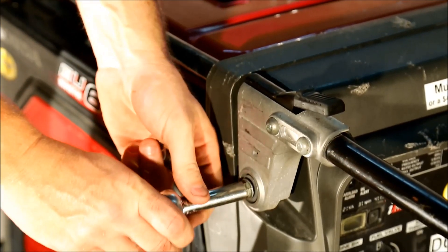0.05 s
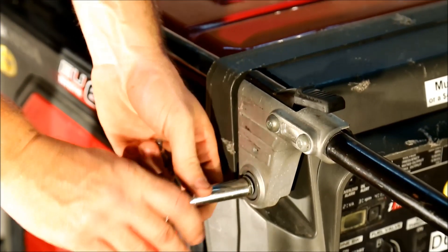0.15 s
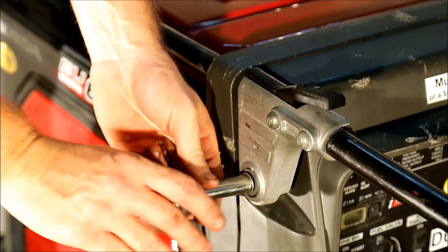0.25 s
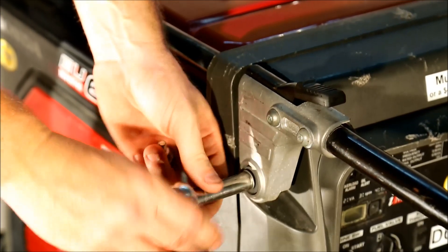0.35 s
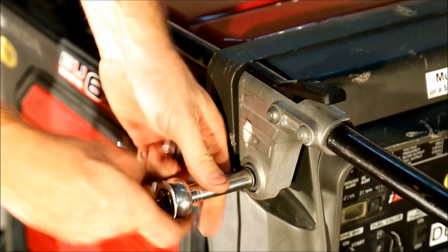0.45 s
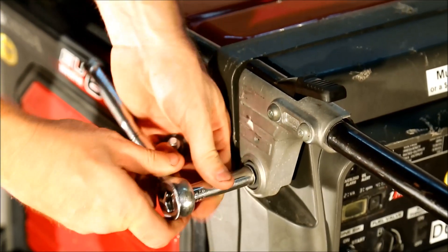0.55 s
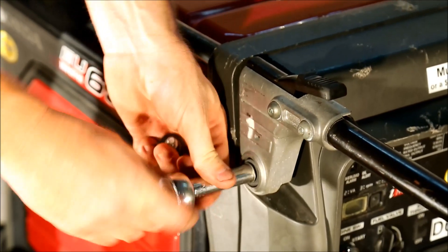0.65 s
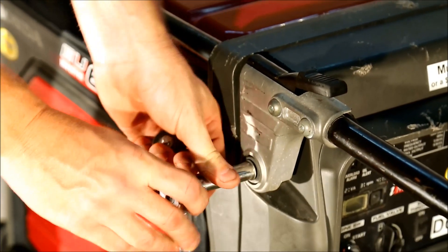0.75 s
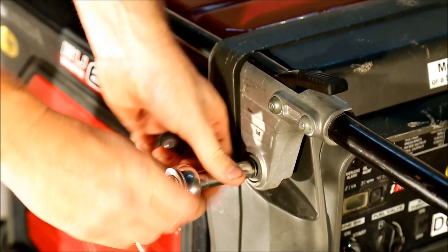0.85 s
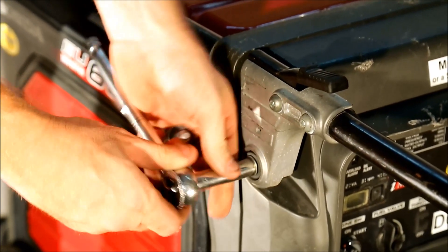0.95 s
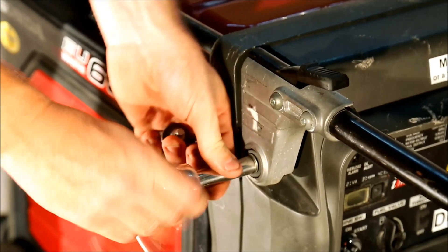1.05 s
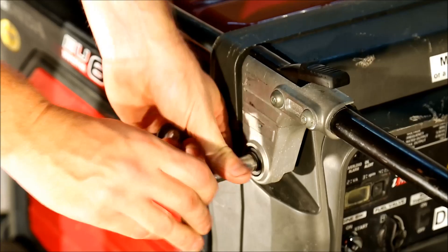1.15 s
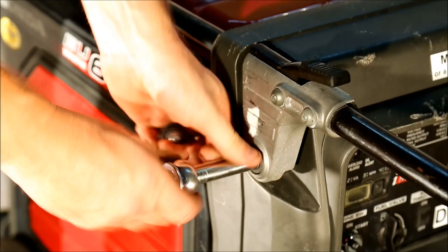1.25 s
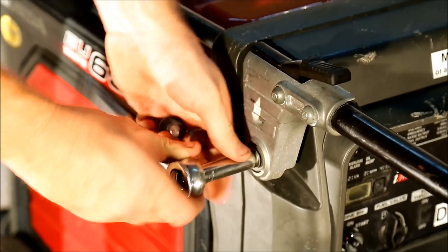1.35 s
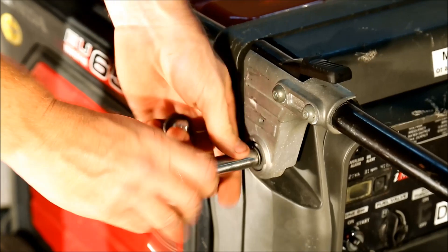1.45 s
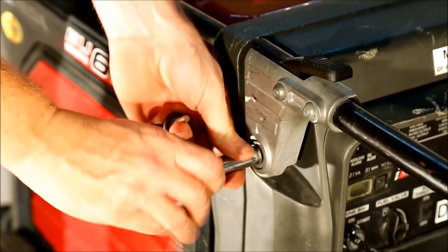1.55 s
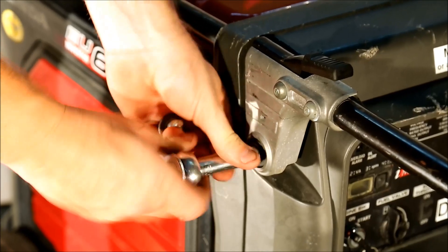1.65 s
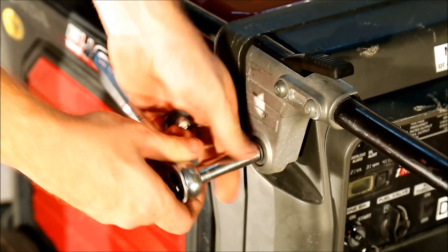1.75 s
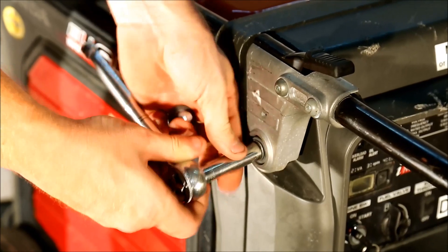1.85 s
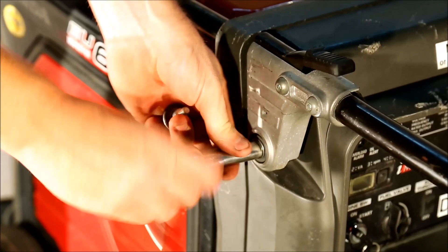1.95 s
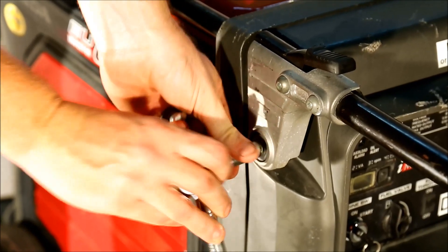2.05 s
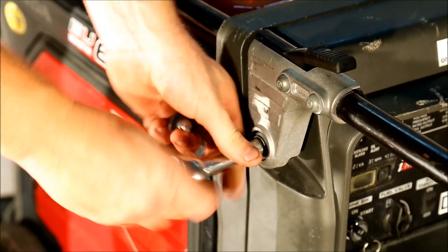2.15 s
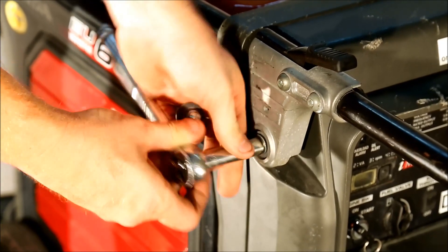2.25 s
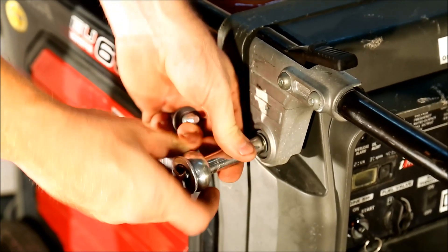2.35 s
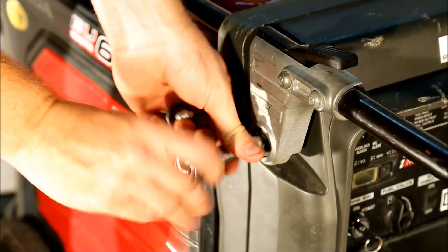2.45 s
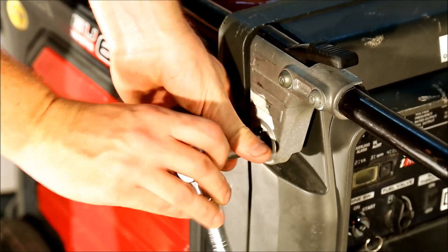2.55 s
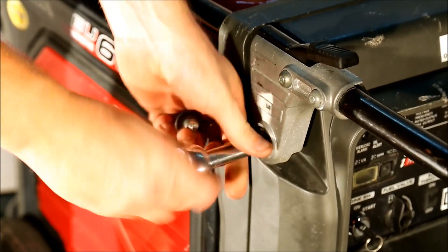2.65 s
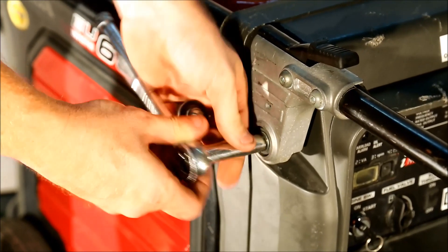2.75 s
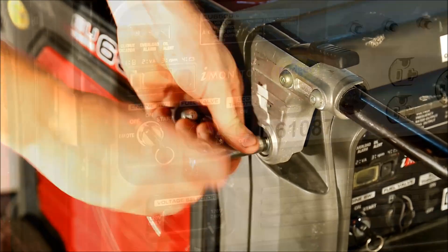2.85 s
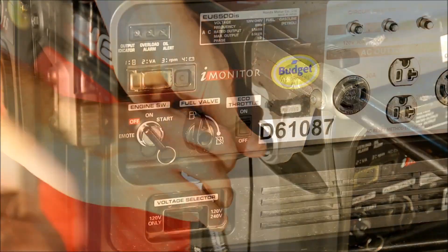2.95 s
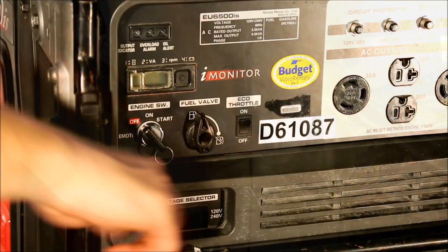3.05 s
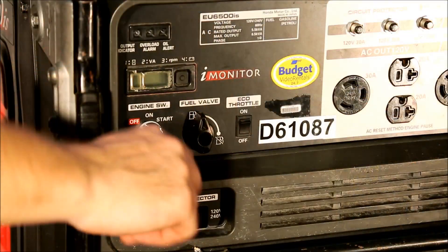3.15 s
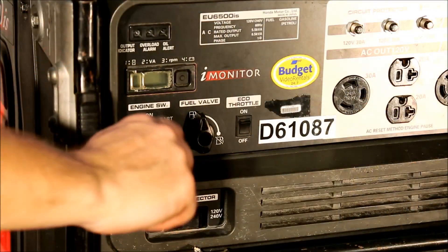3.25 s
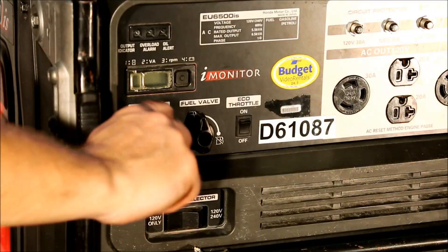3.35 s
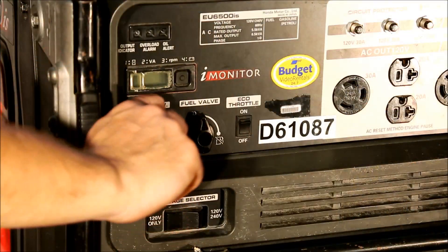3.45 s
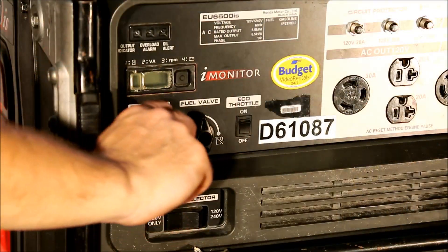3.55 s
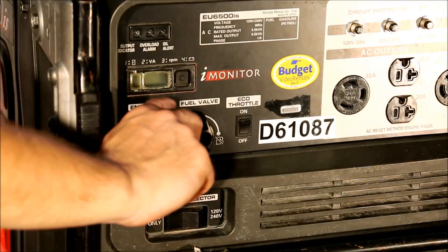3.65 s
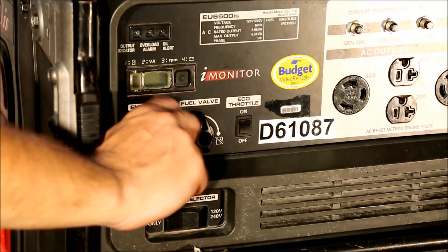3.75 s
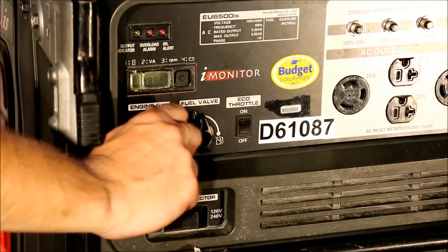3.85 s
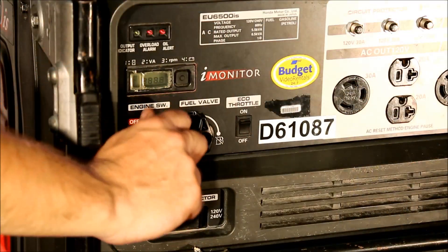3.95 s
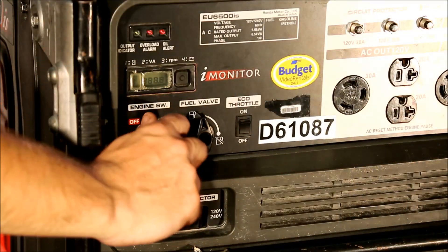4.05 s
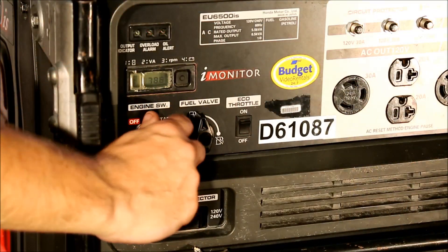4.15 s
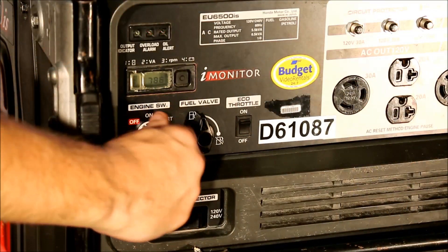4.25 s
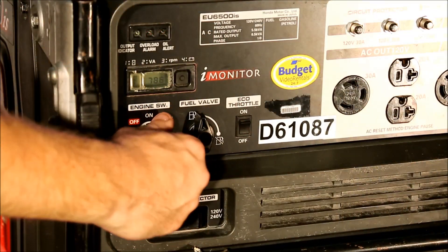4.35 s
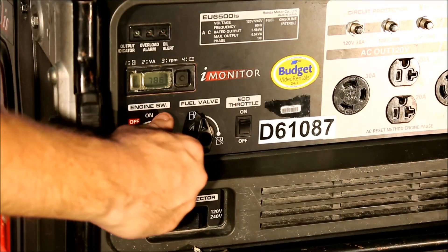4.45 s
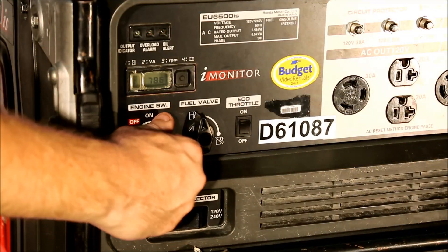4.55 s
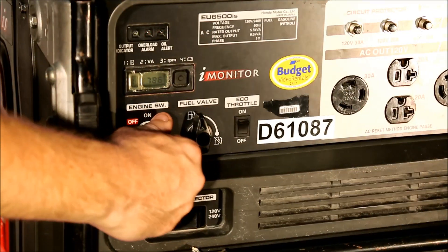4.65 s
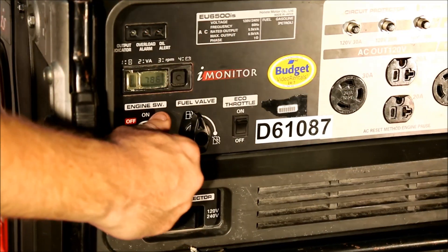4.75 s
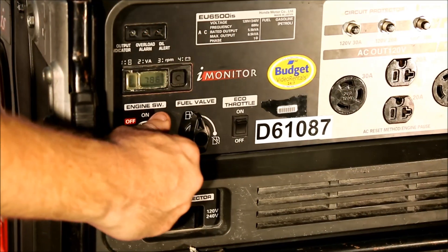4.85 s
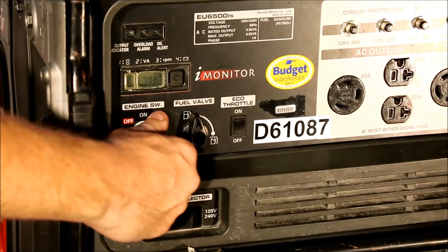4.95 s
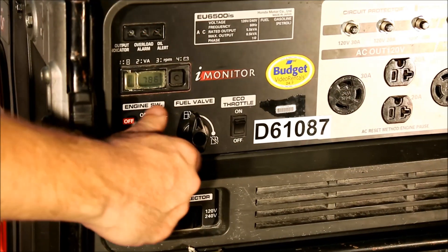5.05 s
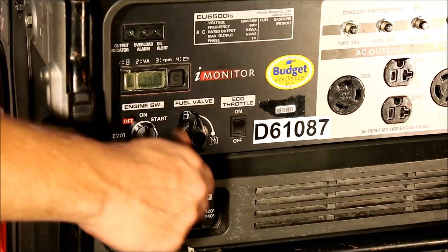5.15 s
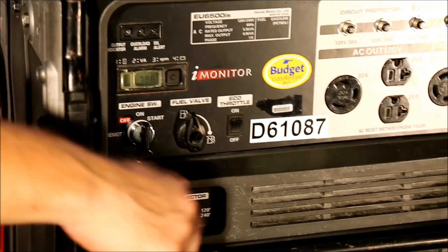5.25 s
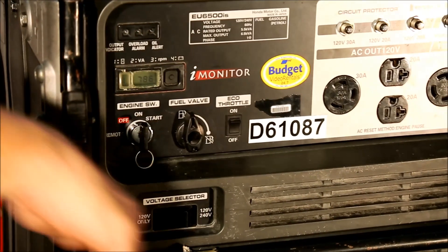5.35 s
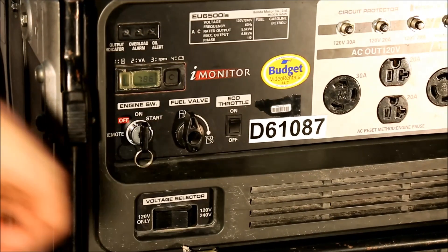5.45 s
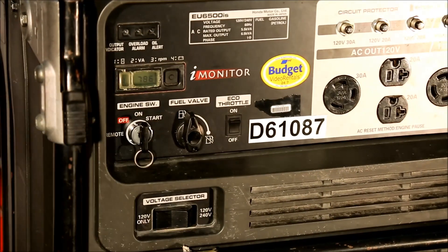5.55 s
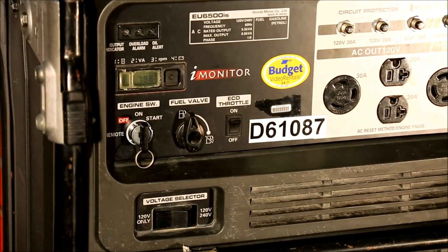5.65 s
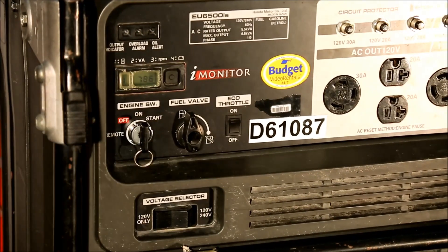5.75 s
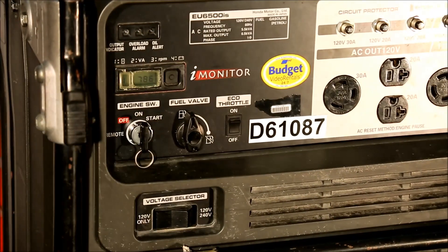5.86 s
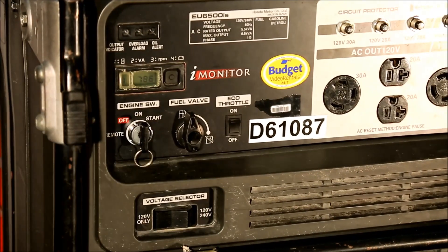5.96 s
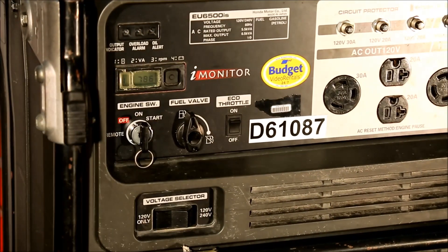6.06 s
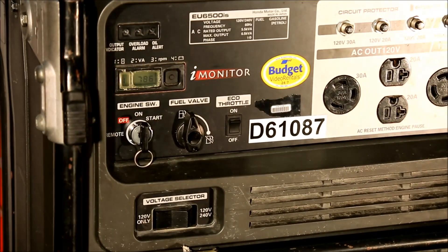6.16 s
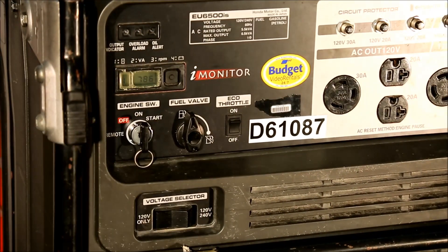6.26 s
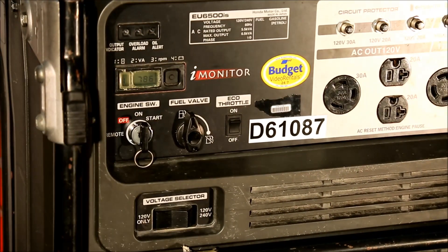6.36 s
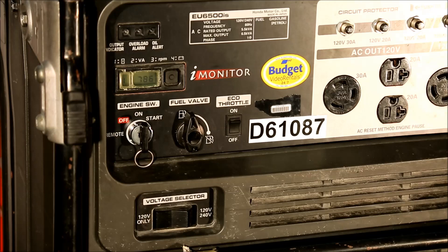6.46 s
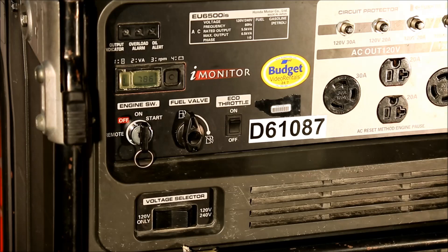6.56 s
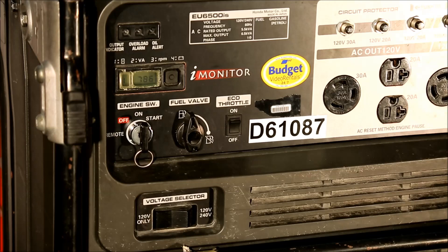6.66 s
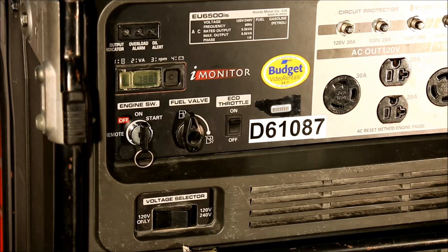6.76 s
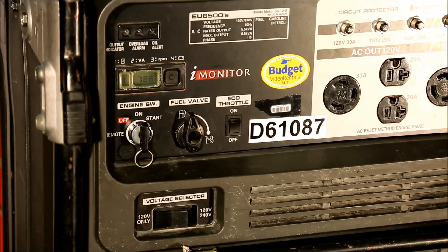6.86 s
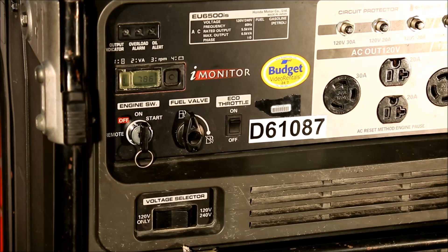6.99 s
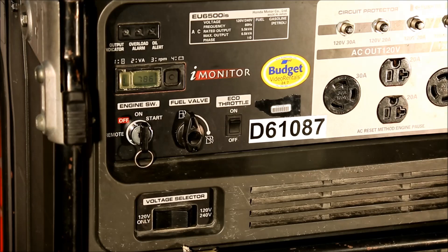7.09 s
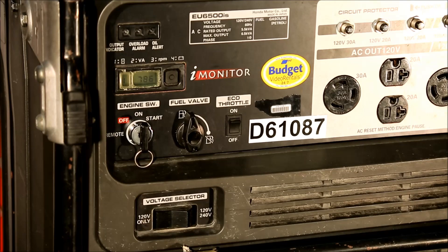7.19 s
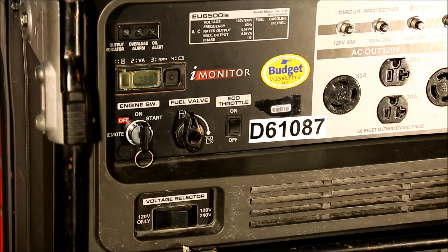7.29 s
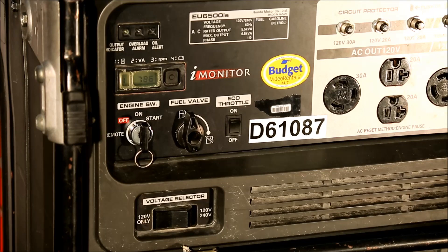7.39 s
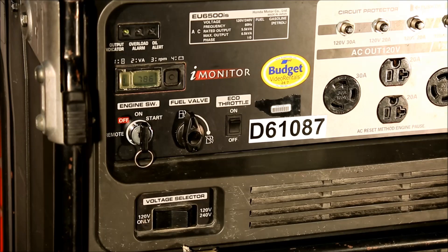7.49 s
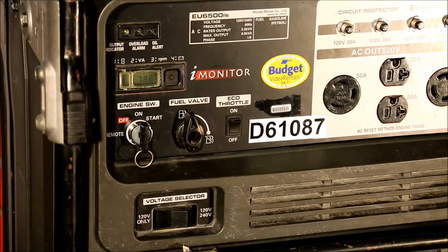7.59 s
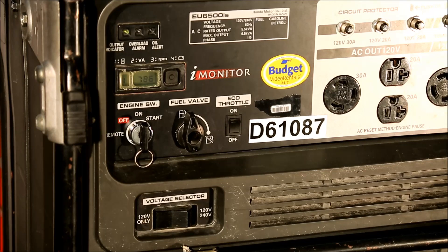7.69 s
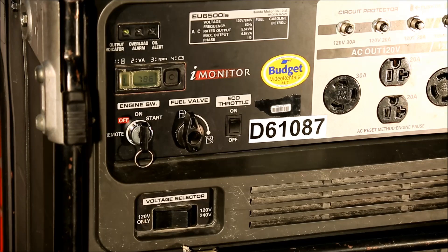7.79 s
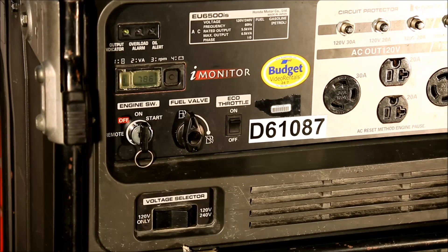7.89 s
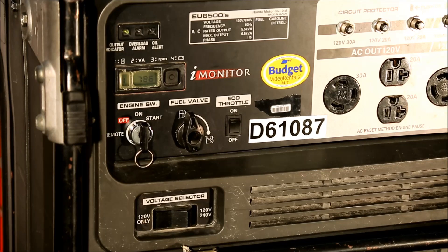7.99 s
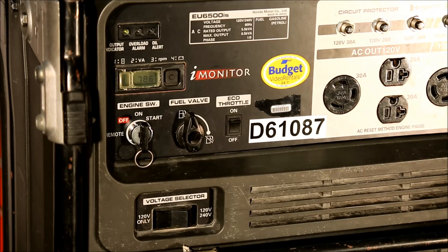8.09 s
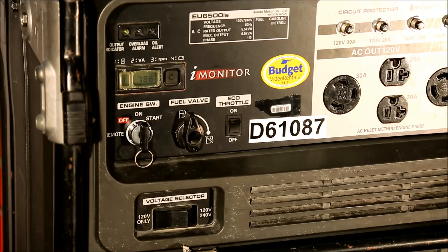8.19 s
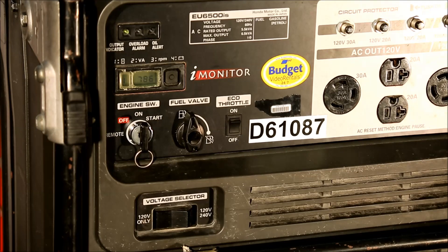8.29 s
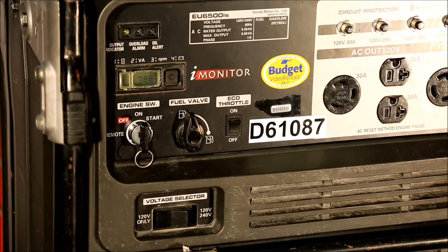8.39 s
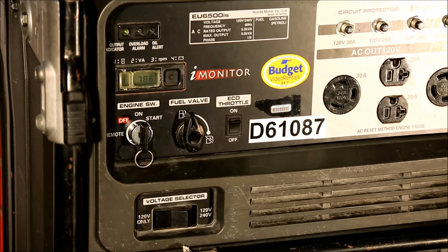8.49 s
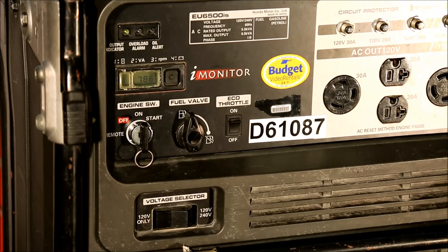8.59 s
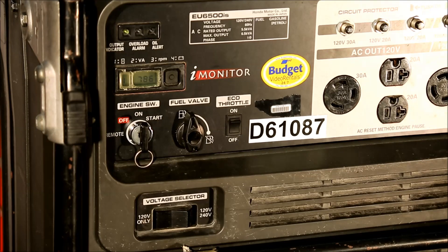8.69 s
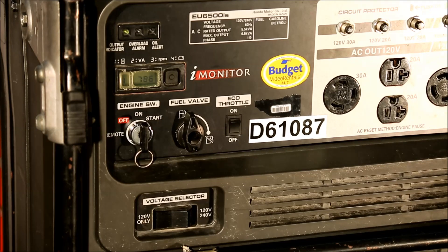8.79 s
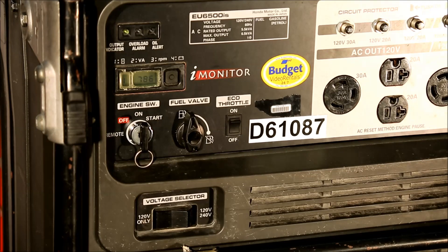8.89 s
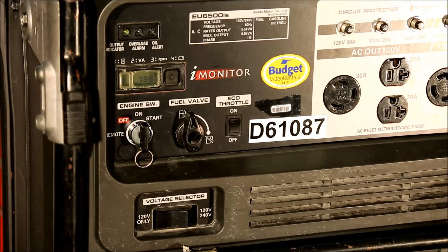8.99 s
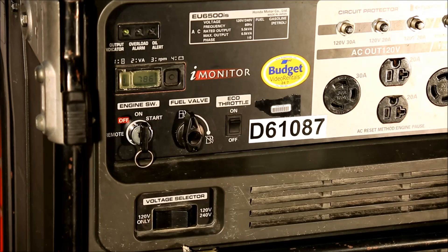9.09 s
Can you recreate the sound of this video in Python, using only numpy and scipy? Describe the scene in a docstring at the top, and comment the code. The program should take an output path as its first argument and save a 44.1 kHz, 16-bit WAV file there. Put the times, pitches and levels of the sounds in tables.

```python
"""A socket ratchet swings back six times on a small generator's frame, its teeth exciting short steel modes,
while knocks and rubbing between the swings come from struck frame modes and coloured noise.
Then a key clicks over and the starter engages and cranks: struck casing, gear noise, rough tones and a squeal.
The single cylinder catches, runs up under load and settles to a muffled drone with a thin alternator whine:
harmonics of the firing rate over noise that throbs with each firing. Close by, outdoors."""
import sys
import numpy as np
from scipy import signal
from scipy.fft import rfft, irfft, next_fast_len
from scipy.io import wavfile
from scipy.ndimage import uniform_filter1d

SR = 44100
rng = np.random.default_rng(int(sys.argv[2]) if len(sys.argv) > 2 else 0)


def int16_out(signal):
    """Quantize to a 16-bit WAV file."""
    q = np.round(np.clip(np.atleast_2d(signal).T, -1, 1) * 32767)
    wavfile.write(sys.argv[1], SR, q.astype(np.int16))


N = 402633
T = np.arange(N) / SR   # time [s]

# short modes of the generator frame: (frequency [Hz], relative level [dB], decay time t60 [s])
FRAME_MODES = [(466, -5, 0.014), (1240, -0.5, 0.0077), (1666, -1, 0.014), (2133, 1, 0.011),
               (2600, -1, 0.0038), (3030, -2.5, 0.0045)]


def amp(db):
    """Level to amplitude: 20 dB is a factor of ten."""
    return 10 ** (np.asarray(db, float) / 20)


def curves(rows, fade=0.024):
    """Linear interpolation of each column over time, after a gate that is open while the table runs."""
    s, *columns = np.transpose(rows)
    gate = np.clip(np.minimum(T - s[0] + fade, s[-1] + fade - T) / fade, 0, 1)
    return [gate] + [np.interp(T, s, column) for column in columns]


def noise(spectrum, peaks=()):
    """Spectral shaping: white noise is weighted by a density curve and resonant lifts; rms 1."""
    size = next_fast_len(N)
    hz = np.maximum(np.fft.rfftfreq(size, 1 / SR), 1)
    points = np.array(spectrum, float)
    db = np.interp(np.log(hz), np.log(points[:, 0]), points[:, 1])
    for centre_hz, width_hz, lift_db in peaks:
        db = db + lift_db / (1 + (2 * (hz - centre_hz) / width_hz) ** 2)
    x = irfft(rfft(rng.standard_normal(size)) * amp(db), size)[:N]
    return x / x.std()


def drift(rate, part=slice(None)):
    """Random modulation: straight lines join normal draws, `rate` (at most 200) of them a second."""
    return np.interp(T[part] * min(rate, 200), range(2000), rng.standard_normal(2000))


def strike(times, db, modes, spread_db=0.0, burst=0.00067, rough=1.0, sway_db=0):
    """Modal excitation: a click and a decaying scatter of contact drive damped resonators of varying strength."""
    at, out = (np.asarray(times) * SR).astype(int), np.zeros(N)
    first, size = at.min(), at.max() - at.min() + SR // 2   # only the stretch that sounds
    chance = rng.standard_normal((len(at), len(modes)))
    grit = rng.standard_normal(size)
    fade = np.exp(-1 / (burst * SR))   # burst: time constant [s]
    knots = rng.standard_normal((len(modes), 200))   # a shifting hold sways each mode's strength over time
    for k, (hz, level_db, t60) in enumerate(modes):
        sway = sway_db * np.interp(at / SR * 14, range(200), knots[k])
        clicks = np.full(size, 1e-18)
        clicks[at - first] = amp(db + level_db + spread_db * chance[:, k] + sway)
        scatter = grit * signal.lfilter([0, 1], [1, -fade], clicks)
        contact = clicks + rough * np.sqrt(1 - fade ** 2) * scatter
        radius, angle = amp(-60 / (t60 * SR)), 2 * np.pi * hz / SR
        resonator = [1, -2 * radius * np.cos(angle), radius * radius]
        ring = signal.lfilter([0, np.sin(angle)], resonator, contact)
        out[first:first + size] += ring * (-1) ** k
    return out


def crack(times, db, low_hz, high_hz, decay):
    """Impulsive noise: each puff dies exponentially, with time constant `decay` [s], within one band."""
    at, out = (np.asarray(times) * SR).astype(int), np.zeros(N)
    clicks = np.full(at.max() - at.min() + SR, 1e-18)   # only the stretch that sounds
    clicks[at - at.min()] = amp(db)
    envelope = signal.lfilter([1], [1, -np.exp(-1 / (decay * SR))], clicks)
    puff = envelope * rng.standard_normal(len(clicks))
    band = signal.butter(2, [low_hz, high_hz], "band", fs=SR, output="sos")
    out[at.min():at.max() + SR] = signal.sosfilt(band, puff)
    return out


def wavering(bands, start, stop, flutter_db, rate, waver):
    """Narrow-band modulation: each tone has random amplitude and pitch of its own between two times."""
    part, out = slice(int(start * SR), int(stop * SR)), np.zeros(N)
    for hz, width_hz, db in bands:
        phase = 2 * np.pi * hz * np.cumsum(1 + waver * drift(rate, part)) / SR
        level = amp(db + flutter_db * drift(rate, part))
        out[part] += level * drift(width_hz, part) * np.sin(phase)
    return out


def yard(x, wet_db, t60):
    """Diffuse reflection: nearby walls return an exponentially decaying noise tail."""
    t = np.arange(SR // 2) / SR
    tail = rng.standard_normal(len(t)) * amp(-60 * t / t60) * (t > .003)
    return x + amp(wet_db) * signal.fftconvolve(x, tail / np.linalg.norm(tail))[:N]


def microphone_hiss():
    """Uncorrelated noise: each channel has faint microphone hiss of its own."""
    # microphone hiss: (frequency [Hz], relative spectral density [dB])
    hiss_spectrum = [(41, -25), (70, 5), (223, -6), (360, -2), (1410, -20.5), (7730, -1.5), (16000, 1)]
    return amp(-66.5) * np.array([noise(hiss_spectrum), noise(hiss_spectrum)])


def outdoor_bed():
    """Ambient noise: a quiet bed, weighted to the low frequencies, is common to both channels."""
    return amp(-64.5) * noise([(40, -6), (130, -3), (500, -6.0), (2000, -14.5)])


def deep_rumble():
    """Low-frequency noise: a narrow band about 38 Hz dies away early, ever faster in level."""
    return amp(-66 - 7 * T ** 2) * noise([(15, -30), (38, 0), (70, -30)])


def handling():
    """Impact and friction: knocks ring the frame with a bright edge, over rubbing noise and small rattles."""
    # tool and fingers on frame and panel: (time [s], relative level [dB], treble over body [dB])
    knocks = [(0.025, -35, -17), (0.044, -31.5, -16), (0.173, -35.5, -26), (0.247, -32, -9),
              (0.375, -53, 9), (0.4115, -48, -13), (0.444, -38, -15), (0.52, -47, 2), (0.531, -45.5, 5),
              (0.547, -54, 7), (0.955, -38, -5), (0.972, -35, 0.5), (1.004, -41, -7), (1.029, -39, -4),
              (1.224, -36, 1), (1.267, -40, 2), (1.285, -37, -3), (1.298, -48, 8.5), (1.386, -52, 11),
              (1.549, -31.5, -13), (1.725, -56, 17), (1.765, -46, -2), (1.794, -46, -13),
              (1.914, -37.5, -15), (2.157, -41.5, 2.5), (2.195, -44, 0), (2.222, -44.5, 5),
              (2.321, -41.5, 4), (2.329, -37.5, -15), (2.615, -46, -8), (2.716, -46.5, 1), (2.729, -43, 2),
              (2.779, -45, -10), (2.841, -37, -6), (3.098, -42, 1), (3.122, -38.5, -7), (3.461, -40.5, -20),
              (3.504, -42.5, -23)]
    # hands rubbing tool and frame: (time [s], relative level [dB])
    rubbing = [(0, -57), (.1, -67.5), (.45, -65), (.64, -69), (1.0, -59.5), (1.3, -61), (1.45, -60),
               (1.88, -68), (2.2, -59), (2.7, -60.5), (3.12, -60), (3.25, -70)]
    # colour of the rub: (frequency [Hz], relative spectral density [dB])
    rub_spectrum = [(35, -8), (90, 8), (400, 7), (2120, -2.5), (4500, -8.5), (7000, -5), (11000, -35)]
    s, db, treble_db = np.transpose(knocks)
    body = strike(s, db - 9.0, FRAME_MODES, spread_db=3.5, burst=0.011, rough=1.78)
    edge = crack(s, db + treble_db, 3800, 8800, 0.0036)
    gate, rub_db = curves(rubbing)
    when, size = rng.random((120, 2)).T
    rattles = strike(when * rubbing[-1][0], 9.2 * size, FRAME_MODES, spread_db=2.0, burst=0.005)
    rub = amp(2.9 * drift(60)) * noise(rub_spectrum) + amp(0.5) * rattles
    return body + edge + gate * amp(rub_db) * rub


def teeth():
    """Ratchet kinematics: the pawl clicks once for every tooth that a swing passes."""
    # six back swings, each a path of
    # (time [s], teeth passed [count], relative click level [dB], upper over lower pawl modes [dB])
    swings = [
        [(0.6757, 0, -24, -4), (0.687, 1, -23, -6), (0.701, 3, -20, -10), (0.7234, 7, -29, -2),
         (0.7432, 10, -26, 3), (0.7598, 12, -24, 7), (0.7985, 16, -23, 10), (0.8107, 17, -28, 6)],
        [(1.0651, 0, -27, -4), (1.0847, 3, -21, 0), (1.0961, 5, -19, 3), (1.1124, 8, -27, 1),
         (1.1223, 10, -26, -1), (1.1474, 14, -23, -5), (1.1559, 16, -23, -7), (1.1703, 20, -24, -7),
         (1.1824, 21, -29, -7)],
        [(1.469, 0, -23, -4), (1.5022, 3, -26, -4), (1.5202, 4, -26, -2), (1.5286, 5, -26, -2),
         (1.5774, 6, -31, 2), (1.6344, 7, -26, 3)],
        [(1.9266, 0, -24, -6), (1.9439, 1, -25, -5), (1.9557, 2, -21, -5), (1.9787, 5, -19, -4),
         (1.9956, 8, -18, -3), (2.0083, 11, -22, -2), (2.0252, 14, -21, 18), (2.0458, 17, -17, 15),
         (2.0676, 20, -24, 2), (2.0771, 21, -27, 1), (2.0968, 22, -29, 0)],
        [(2.3787, 0, -25, -5), (2.397, 1, -27, -6), (2.4437, 5, -28, -10), (2.4685, 8, -26, -12),
         (2.4989, 13, -31, 2), (2.5136, 16, -29, 4), (2.5437, 20, -22, 9), (2.553, 21, -25, 9),
         (2.566, 22, -26, 8), (2.594, 23, -26, 8)],
        [(2.8585, 0, -18, 2), (2.8806, 2, -18, -6), (2.8883, 3, -20, -10), (2.915, 8, -23, -5),
         (2.9269, 10, -25, 10), (2.9469, 13, -18, 15), (2.9596, 15, -25, 2), (2.979, 18, -25, -18),
         (2.9988, 19, -24, -20)],
    ]
    jitter_s = .0003
    rows = []
    for swing in swings:
        s, passed, db, upper_db = np.transpose(swing)
        passed = np.round(passed)
        for tooth in range(int(passed[-1]) + 1):
            rows.append([np.interp(tooth, passed, column) for column in (s, db, upper_db)])
    s, db, upper_db = np.transpose(rows)
    return s + jitter_s * rng.standard_normal(len(s)), db, upper_db


def ratchet():
    """Coupled modes: every tooth rings two groups of pawl modes, the long handle modes and the frame."""
    # lower rings of pawl and gear: (frequency [Hz], relative level [dB], decay time t60 [s])
    pawl_low = [(5710, -3.5, 0.0083), (6200, -2, 0.0069), (7000, -0.5, 0.017), (7500, -3.5, 0.014),
                (8280, -2, 0.0059)]
    # upper rings of pawl and gear: (frequency [Hz], relative level [dB], decay time t60 [s])
    pawl_high = [(9180, -2.5, 0.004), (9760, -1, 0.0084), (10000, 2, 0.0055), (11250, -17.5, 0.025),
                 (15100, -8, 0.0055), (15600, -26, 0.0038)]
    # long rings of steel handle and socket: (frequency [Hz], relative level [dB], decay time t60 [s])
    handle_modes = [(3830, -45, .45), (6970, -43, .6), (9750, -45, .4), (11260, -50, .35)]
    s, db, upper_db = teeth()
    upper = amp(upper_db) ** 2   # energy ratio of upper to lower modes
    low_db = db - 5.0 - 10 * np.log10(1 + upper)
    high_db = db - 2.0 - 10 * np.log10(1 + 1 / upper)
    low = strike(s, low_db, pawl_low, spread_db=4.0, rough=0.17, sway_db=2.0)
    high = strike(s, high_db, pawl_high, spread_db=4.5, rough=0.22, sway_db=0.0)
    flutter = .7 + .9 * drift(130)   # the ring flutters in the moving hand
    handle = strike(s, db, handle_modes, sway_db=5.5) * flutter
    push_db = db - 5.1 * np.log10(1 + upper)   # the frame shakes with the lower rings
    frame = strike(s, push_db - 26.5, FRAME_MODES, spread_db=3.5, burst=0.0033, sway_db=3.5)
    frame += crack(s, push_db - 13.5, 2100, 6400, 0.0042)
    snap = crack(s, push_db - 6.5, 3500, 13000, 0.00046)
    return low + high + handle + frame + snap


def casing_blows():
    """Impact radiation: key detent, pinion and dull kicks ring the casing, with a crack and a low boom."""
    # blows: (time [s], relative ring level [dB], relative crack level [dB], relative boom level [dB],
    # boom frequency [Hz])
    blows = [(3.789, -65, -56, -57, 360), (3.822, -46, -31, -41, 368), (4.354, -40.5, -39, -50, 427),
             (4.382, -19, -42, -24, 450), (4.916, -31, -58, -55, 464), (5.176, -28, -52, -59, 460)]
    # casing modes: (frequency [Hz], relative level [dB], decay time t60 [s])
    casing_modes = [(730, 1, 0.045), (1010, -4, 0.025), (1310, -8, 0.03), (1506, -8, 0.04)]
    s, db, crack_db, boom_db, boom_hz = np.transpose(blows)
    out = strike(s, db, casing_modes, spread_db=1.5, burst=0.012, rough=1.2)
    out += crack(s, crack_db, 370, 10300, 0.0079) + crack(s, crack_db - 15.0, 130, 3400, 0.096)
    for at, level_db, hz in zip(s, boom_db, boom_hz):
        boom_modes = [(hz, 0, .11), (hz * .85, -8, .11), (hz * 0.96, -5, .15), (hz * 1.4, -6, .12)]
        out += strike([at], level_db, boom_modes, burst=0.04, rough=0.6)
    return out


def backlash_clanks():
    """Backlash impact: the gearcase rings first and the heavier block thumps about 3 ms later."""
    # clanks while cranking: (time [s], relative clank level [dB], relative thump level [dB])
    clanks = [(4.6965, -12, -22), (4.763, -20, -30), (4.8384, -15.5, -21.5), (4.9602, -22, -23),
              (5.1362, -18.5, -24.5), (5.215, -16.5, -22), (5.2853, -12.5, -23), (5.3482, -13, -19),
              (5.4125, -20, -24.5)]
    # gearcase modes: (frequency [Hz], relative level [dB], decay time t60 [s])
    gearcase_modes = [(1270, -2.5, 0.036), (1680, 3, 0.024), (2040, -9, 0.032)]
    # engine block modes: (frequency [Hz], relative level [dB], decay time t60 [s])
    block_modes = [(85, -8.5, 0.26), (138, -7, 0.091), (181, -4.5, 0.034), (265, -4.5, 0.071),
                   (468, -10, 0.1), (766, -8.5, 0.04)]
    s, db, thump_db = np.transpose(clanks)
    clank = strike(s, db - 9.5, gearcase_modes, spread_db=0.0, burst=0.0038, rough=1.0)
    clank += crack(s, db - 5, 260, 1860, 0.022)
    thump = strike(s + 0.00319, thump_db, block_modes, burst=0.043, rough=1.25)
    return clank + thump + crack(s + 0.0029, db - 24, 3900, 9600, 0.015)


def valve_ticks():
    """Single-mode resonance: each bright tick is one damped mode at 6730 Hz."""
    # valve ticks: (time [s], relative level [dB])
    ticks = [(4.6928, -29), (4.8591, -30), (4.96, -30), (5.0837, -34), (5.21, -29.5), (5.2914, -33),
             (5.309, -26.5), (5.341, -25.5), (5.406, -28)]
    s, db = np.transpose(ticks)
    return strike(s, db, [(6730, 0, 0.0071)], spread_db=0.0, rough=0.37)


def starter_gears():
    """Gear meshing: coloured noise and rough motor partials swell as the pinion meshes, beside a squeal."""
    # gear noise: (frequency [Hz], relative spectral density [dB])
    gear_spectrum = [(35, -47), (70, -17.5), (182, -9), (469, -3.5), (916, -9.5), (1270, -6.5),
                     (4840, -22.5), (8230, -24), (9670, -40), (15000, -67)]
    # rough motor partials: (frequency [Hz], modulation rate [1/s], relative level [dB])
    motor_partials = [(468, 70, 0), (750, 110, -2), (1270, 110, -7), (2190, 170, -11), (3340, 160, -16),
                      (3690, 160, -16)]
    on_s, mesh_s, mesh_width_s, release_s = 4.345, 4.385, 0.022, 5.01
    squeal_hz, squeal_eases_s = 8200, 4.7
    gate = np.clip((T - on_s) / 0.017, 0, 1)
    mesh_db = 11 * np.exp(-((T - mesh_s) / mesh_width_s) ** 2)
    gear_db = -39 + mesh_db - 47 * np.maximum(T - release_s, 0)   # fades at 47 dB/s
    squeal_db = -60.5 + 4 * drift(22) - 22 * np.maximum(T - squeal_eases_s, 0)   # fades at 22 dB/s
    squeal_band = [(squeal_hz * .96, -30), (squeal_hz, 0), (squeal_hz * 1.04, -30)]
    squeal = noise(squeal_band, [(squeal_hz, 130, 14)])
    motor = wavering(motor_partials, start=4.3, stop=6.5, flutter_db=4.5, rate=16.0, waver=0.02)
    gears = amp(gear_db) * (0.78 * noise(gear_spectrum) + amp(-2.0) * motor)
    return gate * (gears + amp(squeal_db) * squeal)


def key_and_starter():
    """Superposition: blows, clanks, ticks and gear noise add, high-passed at 55 Hz."""
    out = casing_blows() + backlash_clanks() + valve_ticks() + starter_gears()
    return signal.sosfilt(signal.butter(2, 55, "high", fs=SR, output="sos"), out)


def engine_tones(rate, turns, throttle, puff):
    """Harmonic synthesis: exhaust, whine and whirr are multiples of one firing phase."""
    # exhaust lines, 48 being the alternator whine: (harmonic [number], relative level throttle open [dB],
    # relative level throttle eased [dB], loss per firing/s below governed speed [dB])
    exhaust_lines = [(2, -41, -51, .5), (3, -39, -50, 1.5), (4, -45, -39.5, 0), (5, -37, -54, 1),
                     (6, -45, -57, .5), (7, -47, -58, .5), (8, -48, -49, .5), (9, -38, -50, 1.3),
                     (10, -52, -52, 0), (16, -45, -45.5, 3), (18, -52, -50, 2), (48, -42, -39.5, 8)]
    # throttle positions [0-1] between which the exhaust passes from eased to open
    exhaust_opens = (.16, 0.47)
    governed_per_s = 26.9   # firings per s
    whirr, whirr_full = 96, 5   # harmonic; gain of firings/s each second that brings the full whirr
    share = np.interp(throttle, exhaust_opens, (0, 1))
    short = np.maximum(governed_per_s - rate, 0)
    tones, run = np.zeros(N), slice(5 * SR, N)
    for harmonic, open_db, eased_db, loss_db in exhaust_lines:
        k = round(harmonic)
        db = eased_db + share * (open_db - eased_db) - loss_db * short
        level = np.sqrt(2) * amp(db[run] + 1.94 * drift(12, run))
        cycles = k * turns[run] + rng.random() + 0.0023 * k * drift(25, run)
        tones[run] += level * np.sin(2 * np.pi * cycles)
    # a rough whirr on twice the whine while the engine gathers speed
    gain = uniform_filter1d(np.gradient(rate) * SR, size=SR // 3)
    gathering = np.clip(gain / whirr_full, 0, 1)
    whirr_phase = 2 * np.pi * whirr * turns
    whirr_tone = np.sin(whirr_phase) + amp(-16.0) * np.sin(2 * whirr_phase)
    return tones + amp(-45 - 2.0 * short) * gathering * (1 + puff) * drift(200) * whirr_tone


def engine_roar(rumble_db, fan_db, throttle, puff):
    """Amplitude modulation: rumble, fan noise, intake hiss and panel rattle throb with the firing puffs."""
    # rumble: (frequency [Hz], relative spectral density [dB])
    rumble_spectrum = [(25, -12), (100, -3.5), (170, -2), (450, -9.5), (900, -41)]
    # fan and casing: (frequency [Hz], relative spectral density [dB])
    fan_spectrum = [(150, -69), (250, -6), (442, -6), (793, -3), (1190, -5.5), (1320, -3), (1780, -11.5),
                    (2370, -13.5), (9000, -38.5), (11700, -50), (19800, -120)]
    # resonances lifting the fan noise: (frequency [Hz], width [Hz], lift [dB])
    panel_peaks = [(452, 32, 5.5), (728, 220, 2), (1520, 240, 4), (3400, 180, 3.5)]
    # engine hiss: (frequency [Hz], relative spectral density [dB])
    hiss_spectrum = [(3000, 6.5), (4500, -2), (7700, 2), (12000, -19.5), (16000, -45)]
    # bright spit of each firing: (frequency [Hz], relative spectral density [dB])
    spit_spectrum = [(6000, -20), (10000, 0), (16000, -5)]
    # casing panels rattling with the throttle: (frequency [Hz], modulation rate [1/s], relative level [dB])
    rattle_bands = [(2210, 120, -3), (2440, 120, 0), (2900, 150, -6), (3250, 170, -2), (3530, 190, -1),
                    (4000, 200, -8), (5140, 200, -11)]
    hiss_db = -65.5 + 14 * throttle
    load = np.clip(2 * throttle, 0, 1)   # a wider throttle makes the intake gasp harder
    roar = amp(rumble_db - 0.5) * (1.18 + 0.14 * puff) * noise(rumble_spectrum)
    fan = noise(fan_spectrum, panel_peaks)
    roar += amp(fan_db + 1.34 + 0.73 * drift(14)) * (0.72 + 0.12 * puff) * fan
    roar += amp(hiss_db + 4.0 + 1.9 * drift(30)) * (0.8 + 2.2 * load * puff) * noise(hiss_spectrum)
    roar += amp(hiss_db - 3) * load * puff ** 2 * noise(spit_spectrum)
    gasp = noise([(1500, 4), (2500, -1), (7000, -16.5)])
    roar += amp(hiss_db + 6.5) * load * (1.0 + 0.44 * puff) * gasp
    rattle = wavering(rattle_bands, start=5.1, stop=7.6, flutter_db=3.5, rate=7.0, waver=0.015)
    return roar + amp(hiss_db + 8.5) * load * (0.6 + 1.3 * puff) * rattle


def engine():
    """Periodic excitation: the integrated firing rate times both the tones and the puffs in the noise."""
    # engine speed: (time [s], firing rate [1/s])
    speed = [(5.2, 17.5), (5.45, 19.6), (5.66, 23.7), (5.78, 24.6), (6.08, 27.6), (6.45, 28), (6.6, 27.7),
             (6.97, 28.4), (7.15, 28.1), (7.3, 27.5), (7.57, 27.2), (7.92, 26.8), (8.29, 27.3),
             (8.78, 27.7), (9.13, 27.3)]
    # noise and throttle: (time [s], relative rumble level [dB], relative fan and casing level [dB],
    # throttle [0-1])
    roar_course = [(4.66, -49, -47, 0), (4.9, -41, -44, 0), (5.3, -41.5, -36.5, 0.61),
                   (5.6, -40, -35, 0.77), (6.3, -42.5, -32, 0.85), (6.7, -46, -30.5, 0.38),
                   (6.85, -45, -31, 0.31), (7.05, -49, -31.5, 0.21), (7.8, -47, -32.5, 0.17),
                   (8.3, -43.5, -32, 0.19), (9.14, -49.5, -31.5, 0.23)]
    a_firing_s = 6.010   # a firing falls here
    gate, rate = curves(speed, fade=0.026)
    on, rumble_db, fan_db, throttle = curves(roar_course, fade=0.1)
    turns = np.cumsum(rate) / SR   # counts firings
    turns -= turns[int(a_firing_s * SR)]
    # each firing opens a puff that dies through the cycle, its strength drawn by chance
    strength = amp(2.2 * rng.standard_normal(400))[np.floor(turns).astype(int) % 400]
    puff = gate * strength * np.exp(-3.5 * (turns % 1))
    tones = engine_tones(rate, turns, throttle, puff)
    return gate * tones + on * engine_roar(rumble_db, fan_db, throttle, puff)


def scene():
    """Superposition: centred sources add; only the faint microphone hiss differs between the channels."""
    background = microphone_hiss() + outdoor_bed() + deep_rumble()
    tool = yard(handling() + ratchet(), wet_db=-11.0, t60=.35)
    machine = key_and_starter() + engine()
    return background + tool + machine


def record(dry):
    """Low-pass filtering: a steep filter cuts the top, 50 dB down from 16.2 kHz."""
    return signal.sosfilt(signal.cheby2(16, 50, 16200, fs=SR, output="sos"), dry)


dry = scene()
out = record(dry)
int16_out(out)
```